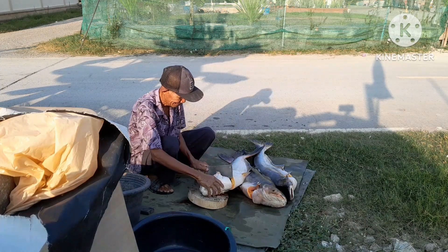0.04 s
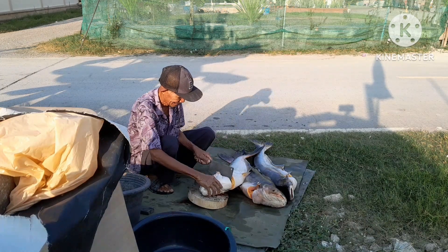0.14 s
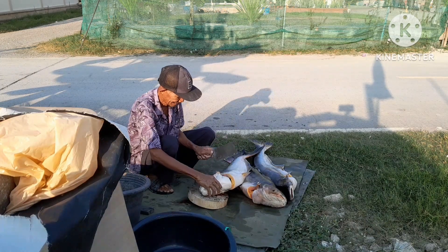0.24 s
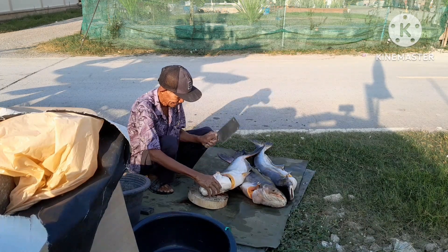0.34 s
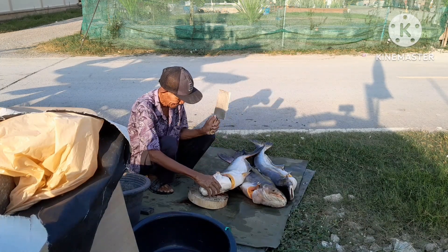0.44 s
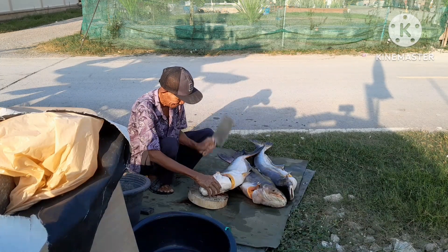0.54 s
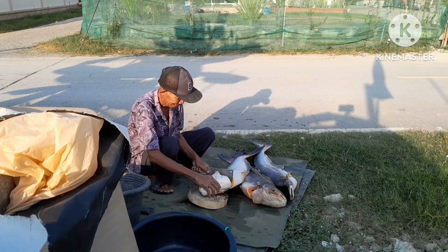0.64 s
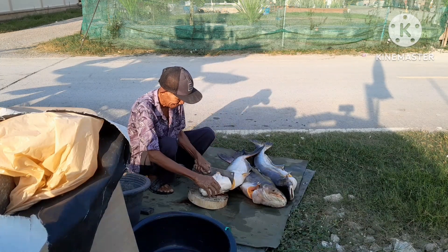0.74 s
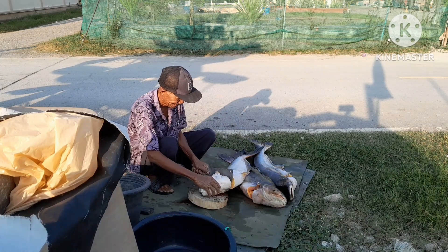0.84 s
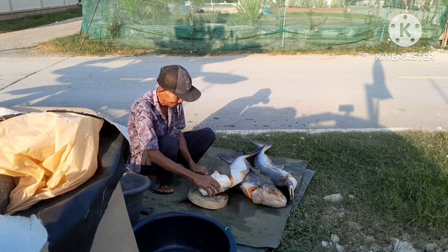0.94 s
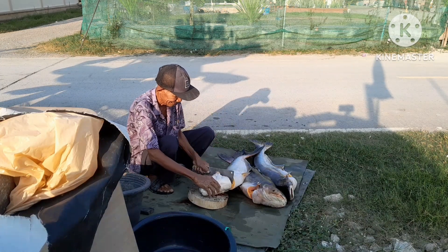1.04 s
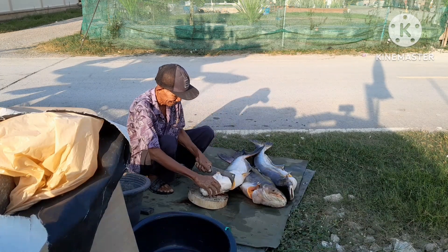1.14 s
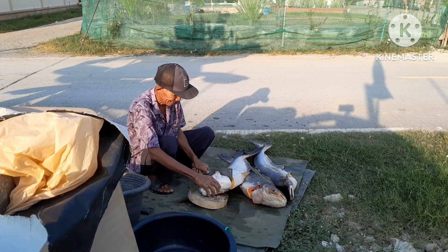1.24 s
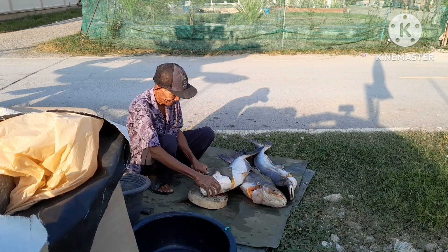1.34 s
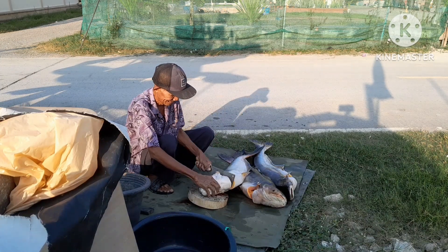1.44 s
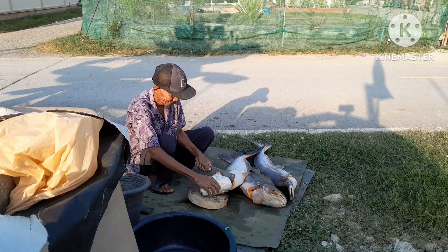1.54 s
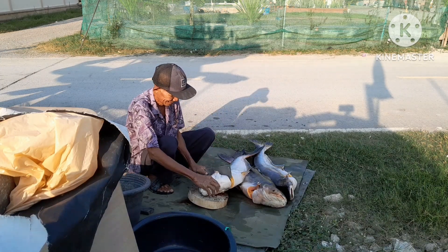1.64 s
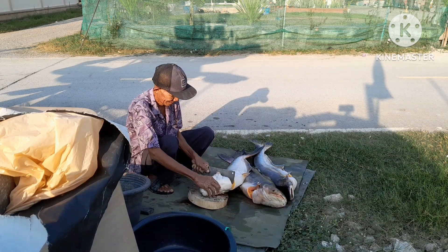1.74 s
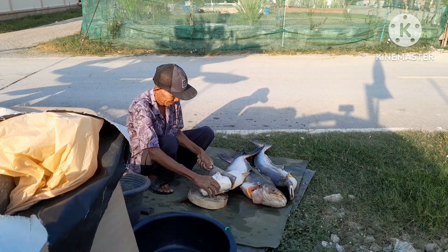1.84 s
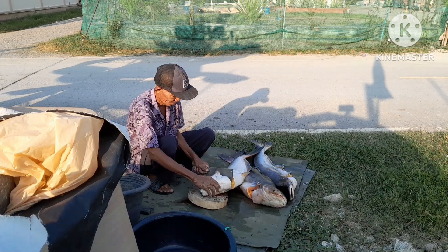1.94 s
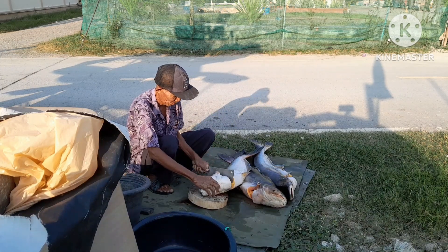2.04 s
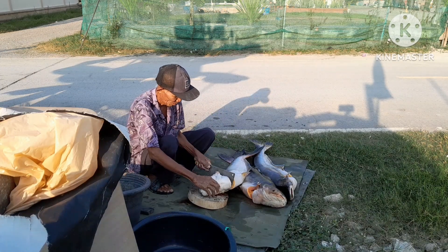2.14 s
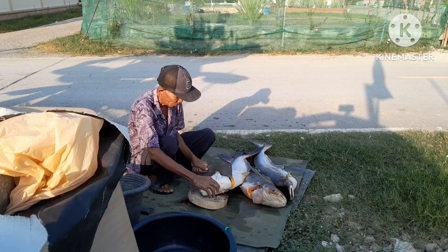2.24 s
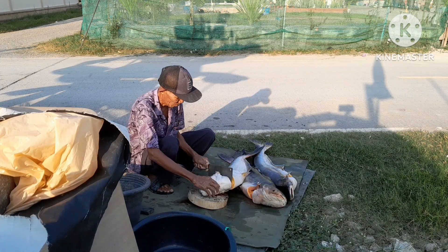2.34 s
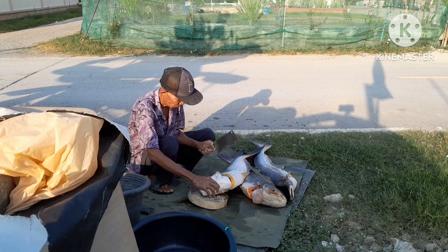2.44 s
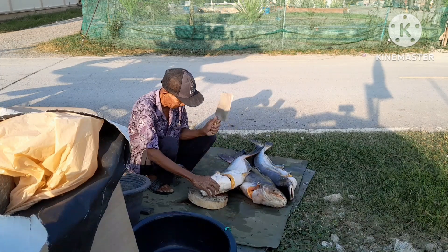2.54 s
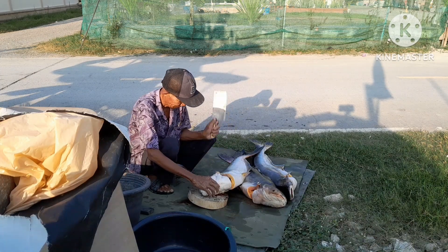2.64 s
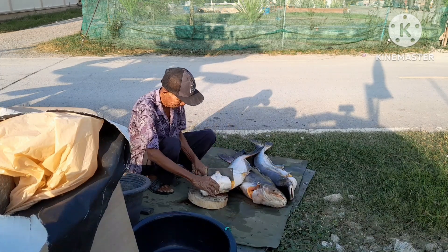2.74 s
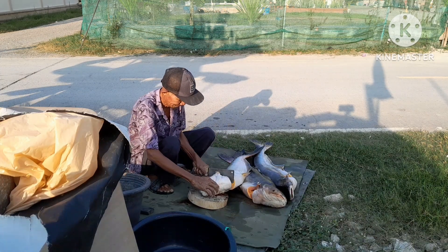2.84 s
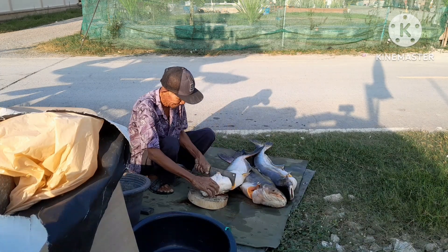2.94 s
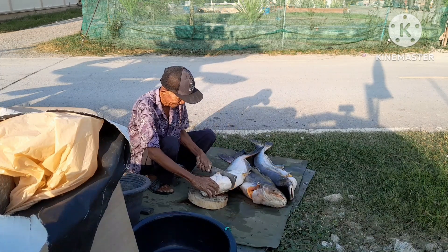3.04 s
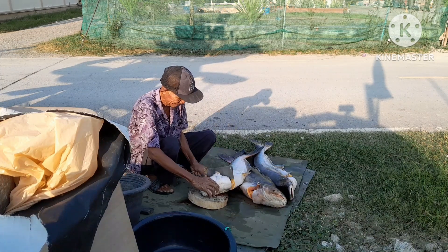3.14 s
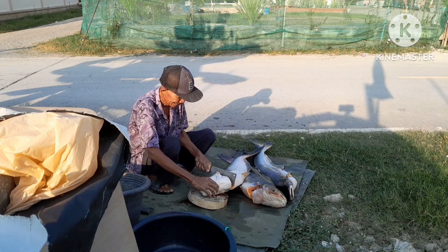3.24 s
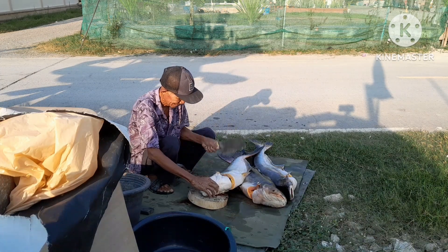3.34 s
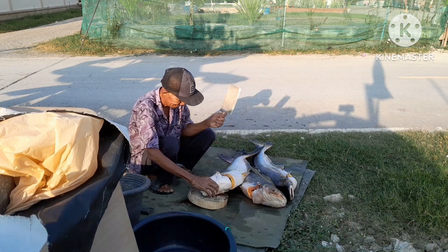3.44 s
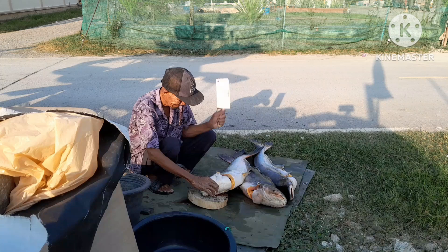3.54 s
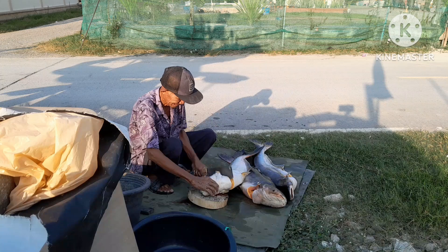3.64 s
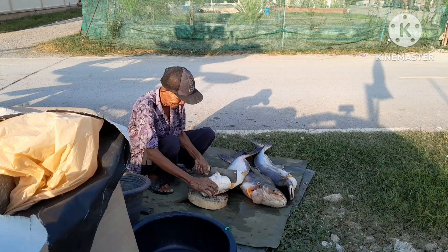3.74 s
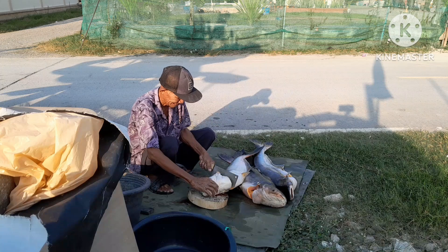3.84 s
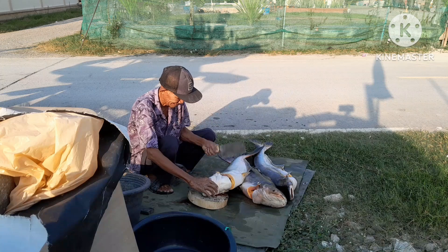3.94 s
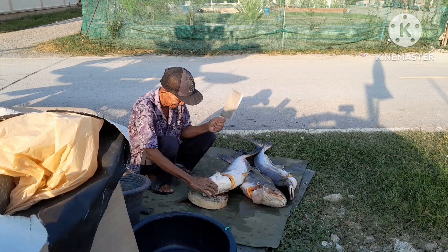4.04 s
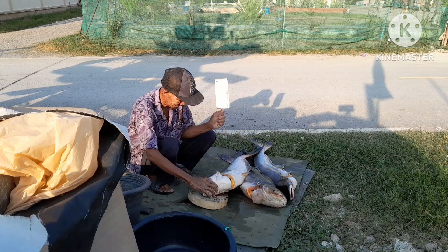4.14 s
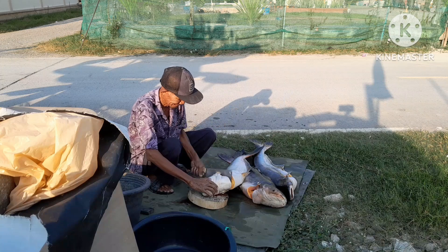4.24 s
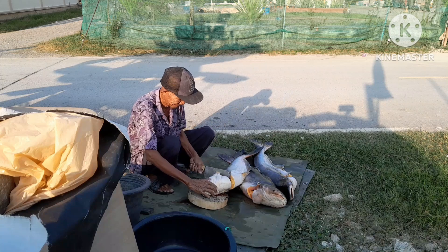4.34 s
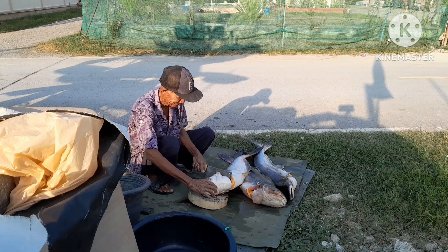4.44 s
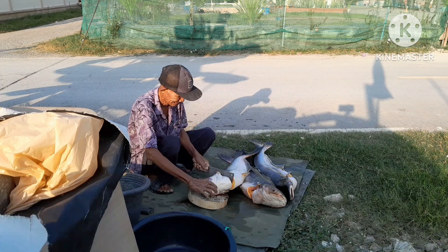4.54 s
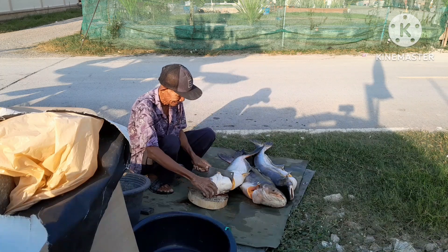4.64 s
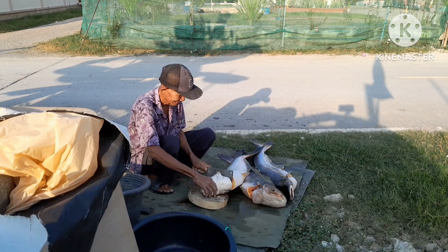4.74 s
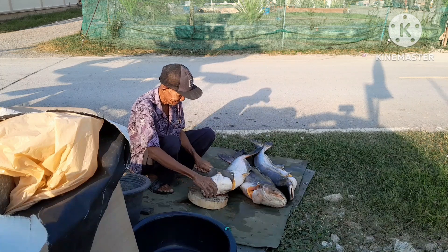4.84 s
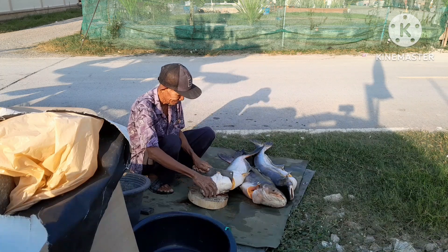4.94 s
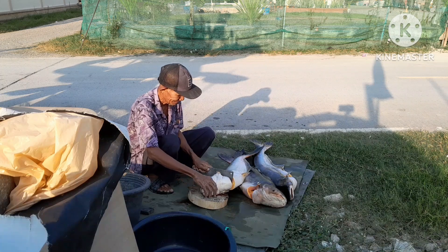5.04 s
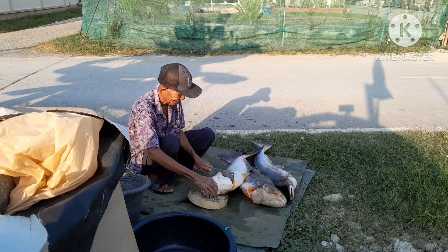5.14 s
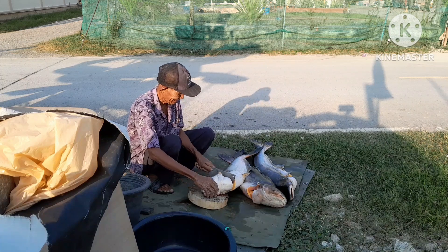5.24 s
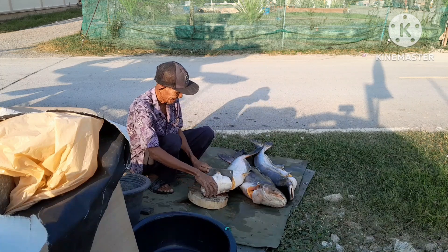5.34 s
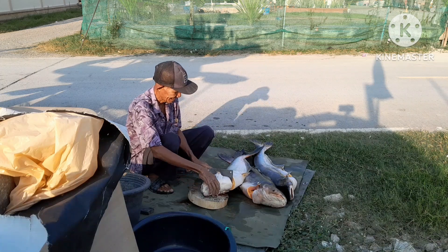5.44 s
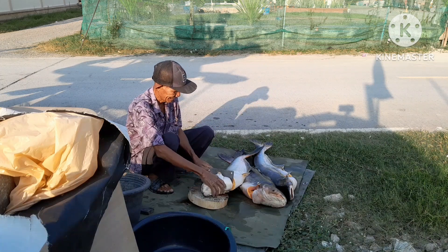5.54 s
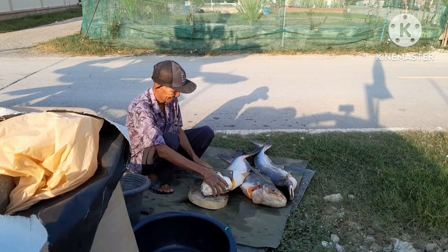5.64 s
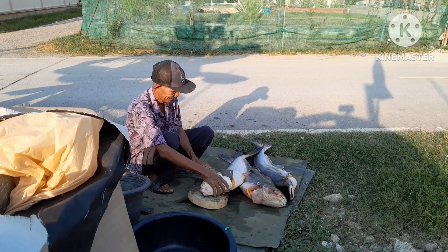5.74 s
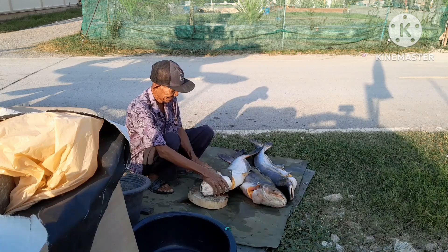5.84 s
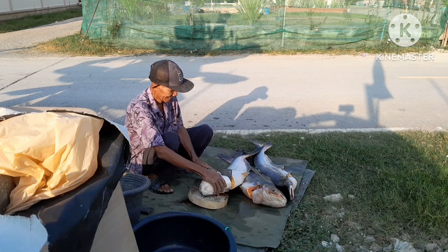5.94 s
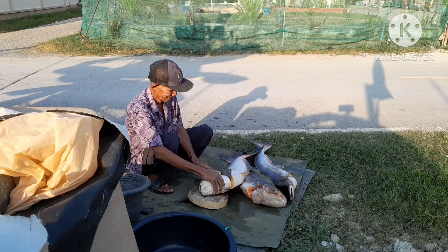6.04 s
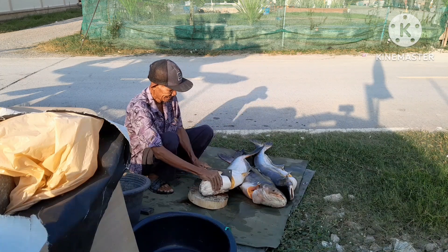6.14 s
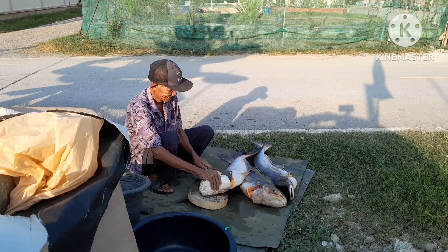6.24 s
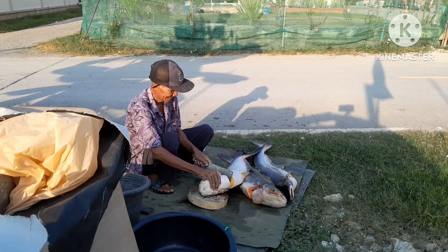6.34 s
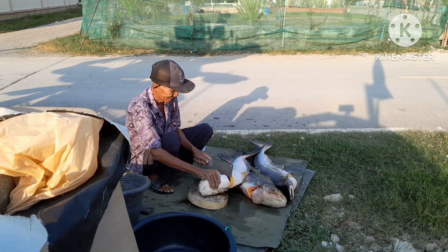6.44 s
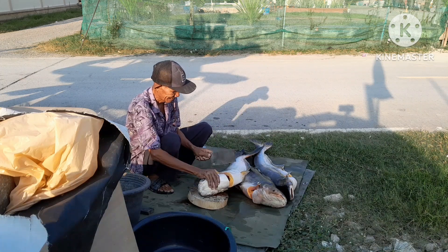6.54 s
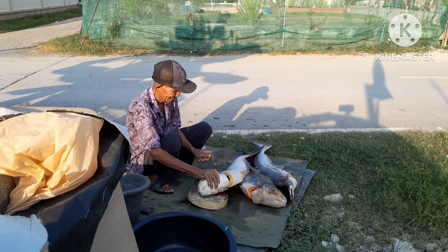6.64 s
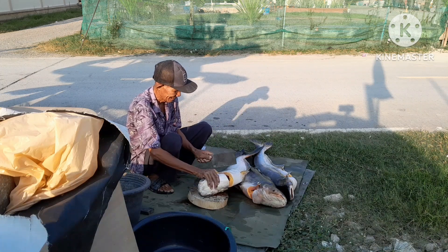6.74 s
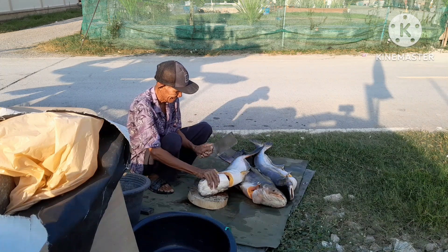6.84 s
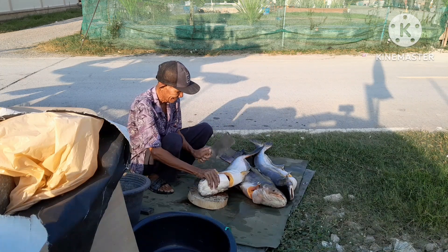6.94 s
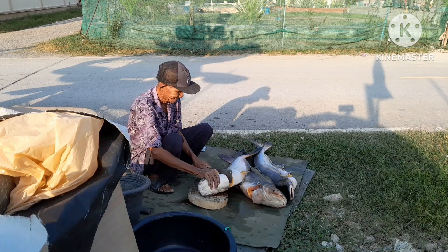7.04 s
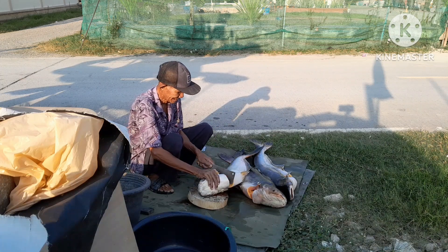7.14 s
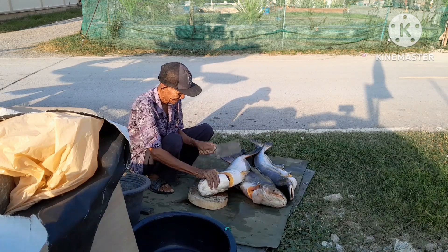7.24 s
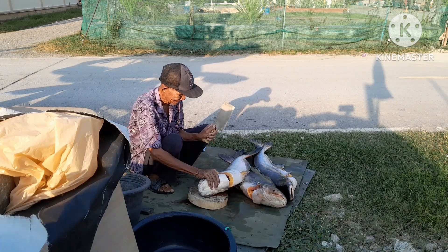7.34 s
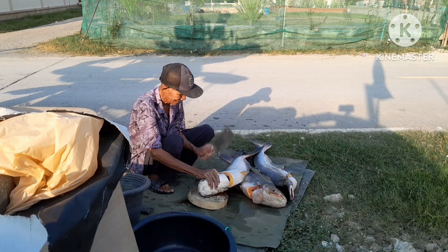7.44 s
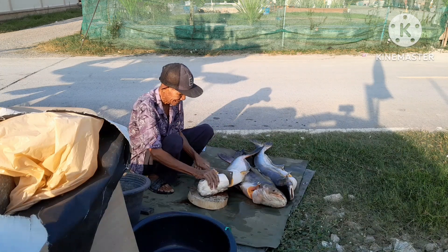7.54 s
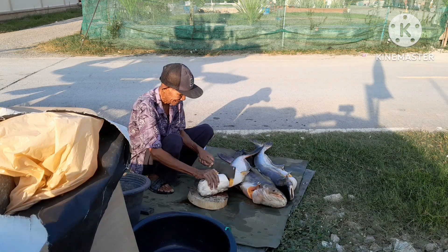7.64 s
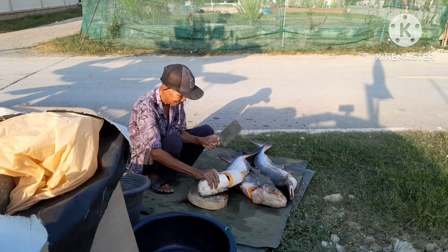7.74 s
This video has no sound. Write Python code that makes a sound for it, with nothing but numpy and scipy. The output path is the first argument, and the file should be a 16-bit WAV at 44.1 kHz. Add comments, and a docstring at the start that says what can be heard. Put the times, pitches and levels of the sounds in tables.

```python
"""A cleaver chops six times through a big fish on a round wooden block beside a quiet road.
Each blow is a noise burst for the bone, damped sines for blade and block, and delayed copies from a wall.
Small birds are gliding sines with shaken pitch, smeared by decaying noise; far roosters add harmonics
and a hoarse haze. Filtered noise makes distant traffic, a far flock, a soft midrange rush and a thin hiss."""
import sys
import numpy as np
from scipy import signal
from scipy.fft import rfft, irfft, next_fast_len
from scipy.io import wavfile
from scipy.ndimage import uniform_filter1d, map_coordinates

SR = 44100
rng = np.random.default_rng(int(sys.argv[2]) if len(sys.argv) > 2 else 0)


def waveform_to_disk(signal):
    """Save audio, clipped to [-1, 1], as 16-bit WAV at the path in sys.argv[1]."""
    frames = np.transpose(np.atleast_2d(signal))
    scaled = np.clip(frames, -1, 1) * 32767
    samples = np.round(scaled).astype(np.int16)
    wavfile.write(sys.argv[1], SR, samples)


N = 343980  # length in samples

# Loudness of the far flock. Each row: time in seconds, level in dB.
FLOCK_LEVEL = [(0, -76.5), (2, -84.5), (4.6, -76), (5.2, -74), (7.8, -67.5)]


def chops():
    """Superposition: direct blow, two specular reflections from a wall, and a diffuse tail."""
    # The blows; the fish loads the block differently each time. Each row: contact in seconds, crack level
    # in dB before a 3 dB cut, treble lift in dB, faint noise around contact in dB relative to the snap,
    # brightest frequency of the bone in Hz, its lift in dB, thud level in dB, knock in Hz, its level in dB
    # and t60 in seconds, final pitch of the clack in Hz, its level in dB and t60 in seconds, hollow mode
    # level in dB.
    blow_rows = [(0.6806, -23, -3.5, -14, 2370, 8.5, -26.5, 280, -23.5, 0.05, 714, -26, 0.033, -26),
                 (2.8245, -21.5, -.5, -7.5, 3200, 3.5, -28, 328, -7.5, 0.029, 700, -11.5, 0.019, -20),
                 (3.7272, -22, 7.5, -11.5, 1710, 1.5, -24.5, 217.4, -13.5, 0.033, 752, -18.5, 0.035, -23),
                 (4.335, -21, 5.5, -17, 3040, 1, -24.5, 325, -5.5, .022, 690, -21, 0.017, -21.5),
                 (7.095, -23, -2, -15, 2950, 4, -27.5, 335, -17.5, 0.038, 720, -24.5, 0.033, -25),
                 (7.5746, -19, -1, -22, 3150, 4.5, -28, 408, -4.5, .015, 605, -11.5, 0.043, -8.5)]
    # A further bone gives way within a blow. Each row: start in seconds, crack level in dB, t60 in seconds.
    second_bones = [(4.347, -30.5, 0.019)]
    crack_t60 = 0.023  # s
    wall_delay = .0345  # s
    first_slap_db, second_slap_db = -21, -30
    out, t = np.zeros((2, N)), np.arange(-SR // 50, SR // 2) / SR
    for s, db, treble_db, skirt_db, bone_hz, bone_db, *knock in blow_rows:
        treble = lambda hz: treble_db * hz ** 2 / (hz ** 2 + 4000 ** 2)
        bone = lambda hz: bone_db * np.exp(-((hz / bone_hz - 1) / 0.1) ** 2)
        coloured = lambda x: filtered(x, lambda hz: amp(db - 3 + treble(hz) + bone(hz)))
        wood = block(t, *knock)
        # the wood stands 0.8 dB stronger on the left
        blow = coloured(bite(t, crack_t60, skirt_db)) + wood * amp([[.4], [-.4]])
        # the crack leaves differently in every direction and comes back in uneven clumps
        rays = [*splinters(t, crack_t60, skirt_db), *splinters(t, crack_t60, skirt_db)]
        clumps = amp(1.8 * wobble(130)[:len(t)])
        crack_tail = clumps * coloured(sum(scatter(ray, stretch=0.87, build=0.0024) for ray in rays))
        wood_tail = scatter(wood, stretch=0.28, build=0.0083)
        add(out, s + t[0], blow + amp(-20.5) * crack_tail + amp(-17.5) * wood_tail)
        add(out, s + t[0] + wall_delay, amp(first_slap_db) * blow)
        # the second answer swaps left and right
        add(out, s + t[0] + 2 * wall_delay, amp(second_slap_db) * blow[::-1])
    for s, db, t60 in second_bones:
        add(out, s + t[0], amp(db) * bite(t, t60, skirt_db=-28.5))
    return out


def bite(t, t60, skirt_db):
    """Brittle fracture excites the damped bending modes of the steel: stereo crack with a brief ring."""
    # The cleaver, choked by flesh. Each row: mode in Hz, level in dB before a 24.5 dB cut, t60 in seconds.
    blade_modes = [(1280, 5, 0.056), (1676, -1, 0.11), (1845, -13, .035), (2317, -18, 0.041),
                   (2710, -9, .035), (3180, 9.5, 0.019), (4260, 1.5, 0.027), (4710, 10.5, 0.018),
                   (5406, 4, 0.026), (6300, -35.5, 0.0298), (7560, 13.5, 0.011), (9420, 10.5, 0.034),
                   (13900, -4, .03), (14100, -3, .03)]
    # Stereo spread of the crack. Each row: frequency in Hz, gain of the side signal in dB.
    side_gain = [(150, -23.5), (450, -21.5), (1000, -4), (2200, -8), (4500, -9.5), (9000, -0.5),
                 (15000, -3)]
    after = np.maximum(t, 0)
    mid, side = splinters(t, t60, skirt_db)
    for hz, db, ring_t60 in blade_modes:
        # every blow strikes the modes a little differently
        level = amp(db - 24.5 + 1.5 * rng.normal())
        mode_hz = hz * (1 + 0.00451 * rng.normal())
        tone = np.sin(2 * np.pi * (mode_hz * after + rng.random()))
        ring = level * fade(after, ring_t60) * tone * (t >= 0)
        mid, side = mid + ring, side + ring * rng.normal()
    side = filtered(side, lambda hz: amp(along(side_gain, hz)))
    return np.array([mid + side, mid - side])


def splinters(t, t60, skirt_db):
    """Fracture noise: the gritty crack of bone as sent in two directions; t = 0 when the edge meets it."""
    # Colour of the crack. Each row: frequency in Hz, relative level in dB.
    crack_colour = [(150, -15), (450, 9.5), (800, 9), (1020, -7), (1600, 1), (3200, 0.5), (6000, -3.5),
                    (8000, -8), (12000, -8.5), (15500, -11.5)]
    after = np.maximum(t, 0)
    noise = rng.standard_normal((2, len(t)))
    # the strength jumps every half millisecond
    steps = np.repeat(rng.standard_normal(len(t)), SR // 2000)[:len(t)]
    grit = noise * amp(1.5 * steps)
    # a faint noise swells in and out around each hit, the bone snaps, then wet flesh closes on the blade
    skirt = amp(skirt_db) * fade(np.abs(t), 0.014)
    snap = fade(np.maximum(after - .001, 0), t60) * (1 - np.exp(-after / 0.00021))
    flesh = amp(-22) * fade(after, .09) * (t > 0)
    return unit(filtered(grit, lambda hz: amp(along(crack_colour, hz)))) * (skirt + snap + flesh)


def block(t, thud_db, knock_hz, knock_db, knock_t60, clack_hz, clack_db, clack_t60, hollow_db):
    """Modal synthesis: three short modes of the wood, and the two-mode thud of the block on the ground."""
    # the blade's push lowers the clack by this share, and lets go with this time constant in seconds
    squeeze, release_s = 0.21, 0.0029
    after = np.maximum(t - .0013, 0)  # the blow reaches the wood a moment later
    mode = lambda hz, db, t60: amp(db) * fade(after, t60) * np.sin(2 * np.pi * hz * after)
    rising_hz = clack_hz * (1 - squeeze * np.exp(-after / release_s))
    clack_phase = 2 * np.pi * np.cumsum(rising_hz * (after > 0)) / SR
    clack = amp(clack_db) * fade(after, clack_t60) * np.sin(clack_phase)
    wood = mode(knock_hz, knock_db, knock_t60) - mode(481, hollow_db, 0.027) + clack
    thud = mode(120, thud_db, 0.091) - mode(216, thud_db, 0.049)
    return (wood + thud) * (1 - np.exp(-after / 0.0025))


def touches():
    """Friction noise: faint wet ticks, decaying exponentially, as fish is shifted and blade pulled free."""
    # Each row: start in seconds, level in dB, t60 in seconds.
    tick_rows = [(.605, -64, 0.12), (0.977, -61, 0.44), (3.232, -67, 0.034), (4.69, -72, 0.36),
                 (4.75, -73, 0.05), (6.382, -63, 0.14)]
    level, t = np.zeros(N), np.arange(SR // 4) / SR
    for s, db, t60 in tick_rows:
        add(level, s, amp(db) * fade(t, t60))
    return level * rush([(500, -4), (3000, 7), (5000, 12), (9000, 4.0), (15000, 2)])


def birds():
    """Direct and scattered sound together: whistles and raspy chirps from the trees, smeared by distance."""
    song, chatter = whistles(), chirps()
    clear = song + amp(2.0) * scatter(song, stretch=1.3, build=0.01)
    return clear + amp(3) * chatter + amp(3.5) * scatter(chatter, stretch=1.0, build=0.0033)


def whistles():
    """Near-sinusoidal tones with gliding frequency: arched slurs, short piping and thin peeps."""
    # One bird repeats a long slur, up and down again. Each row: start in seconds, level in dB.
    slur_rows = [(.19, -66.5), (3.84, -65.5), (7.32, -60.5)]
    # Short, slightly arched notes. Each row: start in seconds, length in seconds, middle pitch in Hz,
    # glide from end to end as a share of that pitch, level in dB.
    pipe_rows = [(-.04, 0.15, 2800, -0.099, -65.5), (0.142, 0.081, 2670, -0.084, -62.5),
                 (0.26, 0.22, 2530, -0.071, -70.5), (.18, 0.18, 3500, 0.034, -71.5),
                 (0.875, 0.14, 3404, 0.023, -68.5), (0.988, 0.08, 1944, 0.13, -75),
                 (1.148, 0.075, 2885, 0.074, -71.5), (2.973, 0.078, 4630, 0.044, -78),
                 (3.608, 0.11, 3830, -.03, -73.5), (3.898, 0.12, 2600, -.09, -77),
                 (4.496, 0.12, 3250, 0.057, -63.5), (4.615, .16, 3740, -0.036, -71.5),
                 (4.724, 0.059, 2510, -0.16, -70.5), (5.269, 0.077, 4040, -.1, -72),
                 (5.855, .17, 3118, -0.0073, -62), (6.279, 0.15, 3716, 0.0052, -69.5),
                 (6.584, 0.191, 3053, -.01, -61), (7.205, 0.098, 2947, 0.039, -56.5),
                 (7.338, 0.086, 3740, .02, -69.5), (7.367, 0.056, 2904, -0.077, -58.5),
                 (7.61, 0.068, 2800, -0.035, -62), (7.756, .065, 2680, -.04, -55.5)]
    # Thin high calls of a small bird. Each row: start in seconds, level in dB.
    peep_rows = [(1.81, -83), (3.992, -86), (4.97, -84)]
    slur_s, slur_hz = .5, [3370, 4100, 4360, 3860, 3230]  # pitch at even steps
    # the voice breaks at the top: place and width as shares of the length, depth in dB
    break_place, break_width, break_db = 0.49, 0.13, -19
    arch = .018  # both ends of a piped note lie this share under its middle, glide aside
    song = np.zeros(N)
    whistle = lambda length, pitches: note(length, pitches, waver=.018, rate=300)
    for s, db in slur_rows:
        slur = whistle(slur_s, slur_hz)
        top = np.exp(-((np.linspace(0, 1, len(slur)) - break_place) / break_width) ** 2)
        add(song, s, amp(db + break_db * top) * slur)
    for s, length, hz, glide, db in pipe_rows:
        pitches = [hz * (1 - arch - glide / 2), hz, hz * (1 - arch + glide / 2)]
        add(song, s, amp(db) * note(length, pitches, waver=.011, rate=260))
    for s, db in peep_rows:
        add(song, s, amp(db) * whistle(length=.15, pitches=[7680, 7500]))
    return song


def chirps():
    """Fast random frequency modulation makes short sweeps raspy: near ones, and far ones at random times."""
    # The nearest chirps. Each row: start in seconds, middle pitch in Hz, fall on either side of it as a
    # share (negative rises), level in dB before the birds are mixed.
    near_rows = [(.5, 4830, -0.13, -67.5), (1.457, 4750, 0.09, -70.5), (1.769, 4000, 0.12, -75.5),
                 (1.99, 3470, 0.05, -72.5), (2.176, 3340, 0.15, -67), (2.633, 3490, 0.25, -66),
                 (3.07, 3890, 0.087, -77), (3.28, 3900, 0.081, -70), (3.44, 3540, 0.15, -69),
                 (4.197, 4320, 0.11, -68), (4.5, 5070, .04, -70), (4.68, 4610, 0.15, -64.5),
                 (4.925, 4140, .09, -68.5), (5.065, 4210, 0.049, -68), (5.169, 5030, .13, -71),
                 (6.21, 5200, 0.19, -67), (6.415, 4440, .09, -66), (6.75, 4740, .16, -67),
                 (7.516, 4780, -0.086, -60.5)]
    far_per_s, far_middle_hz, far_spread = 4, 4520, .2  # spread: share of the pitch, up or down
    far_offset_db = -5.5  # over the flock's level
    chatter = np.zeros(N)
    when, pitch = rng.random((int(far_per_s * N / SR), 2)).T
    far_s = when * N / SR
    far_hz = far_middle_hz * (1 + far_spread * (2 * pitch - 1))
    far_db = far_offset_db + np.interp(far_s, *np.transpose(FLOCK_LEVEL))
    far_fall = rng.uniform(0, .2, len(far_s))
    for s, hz, fall, db in [*near_rows, *zip(far_s, far_hz, far_fall, far_db)]:
        sweep = note(.052, [hz * (1 + fall), hz * (1 - fall)], waver=.13, rate=900)
        add(chatter, s, amp(db) * sweep)
    return chatter


def note(length, pitches, waver, rate):
    """Phase is the integral of frequency: one swelling, gliding bird note, shaken rate times a second."""
    u = np.linspace(0, 1, int(length * SR))
    shake = lambda: np.interp(u * length * rate, np.arange(SR // 100), rng.standard_normal(SR // 100))
    # a polynomial through the pitches
    curve = np.polyfit(np.linspace(0, 1, len(pitches)), pitches, len(pitches) - 1)
    glide = np.polyval(curve, u)
    swell = np.abs(np.sin(np.pi * u)) ** 0.64 * amp(1.3 * shake())
    return swell * np.sin(2 * np.pi * np.cumsum(glide * (1 + waver * shake())) / SR)


def roosters():
    """Harmonic voices: far crows with arched pitch, whose hoarseness smears the second harmonic to a haze."""
    # Each row: start in seconds, length in seconds, base pitch of the second harmonic in Hz, rise as a
    # share of it, level in dB before mixing, fundamental in dB relative to that, hoarseness from 0 to 1.
    syllables = [(2.098, .3, 1310, 0.13, -63, -9, 0.27), (2.43, 0.28, 1342, 0.1, -62.5, -16, 0.27),
                 (3.446, 0.24, 1323, 0, -72, 5, 0.34), (5.04, 0.19, 1344, 0.011, -59, -14, 0.22),
                 (5.199, .31, 1354, 0.1, -62.5, -16, 0.67), (5.534, 0.26, 1457, 0.023, -66, -17, 0.47),
                 (6.242, 0.39, 1450, .08, -75.5, 5.5, 0.62), (6.741, .31, 1482, 0.065, -62, 4, 0.81),
                 (6.796, 0.21, 1793, 0.027, -67, -12, 0.73), (7.383, 0.25, 1428, .01, -64, -5, 0.65)]
    top, arch = .63, .3  # place and width of the pitch arch, shares of the syllable
    edge_s = 0.035  # attack and release
    direct_db, answer_db = 2.5, -2
    crow, haze = np.zeros(N), np.zeros(N)
    for s, length, base_hz, rise, db, fundamental_db, hoarse in syllables:
        t, hoarse = np.arange(int(length * SR)) / SR, np.clip(hoarse, 0, 1)
        waver = 1 + .004 * wobble(60)[:len(t)]
        rasp = 1 + .07 * wobble(500)[:len(t)]
        hz = base_hz * (1 + rise * np.exp(-((t / length - top) / arch) ** 2))
        level = amp(db) * np.clip(np.minimum(t, length - t) / edge_s, 0, 1)
        phase = np.pi * np.cumsum(hz * waver) / SR  # of the fundamental, at half of hz
        voice = np.sin(2 * phase) + amp(fundamental_db) * np.sin(phase) + amp(-25.5) * np.sin(3 * phase)
        hoarse_voice = np.sin(2 * np.pi * np.cumsum(hz * rasp) / SR)
        add(crow, s, np.sqrt(1 - hoarse) * level * voice)
        add(haze, s, np.sqrt(hoarse) * level * hoarse_voice)
    answer = scatter(crow + haze, stretch=.7, build=.012)
    direct = from_right(crow * amp([[-1], [4]]))
    return amp(direct_db) * direct + amp(answer_db) * answer


def outdoors():
    """Many incoherent sources sum to noise: distant traffic, a far flock's twitter and a thin steady hiss."""
    # A far engine's drone surges and sinks several times. Each row: time in seconds, level in dB.
    engine_level = [(0, -55.5), (3.6, -56), (4.25, -51), (4.7, -58.5), (5.05, -50), (5.9, -50),
                    (6.6, -51.5), (7.05, -56.5), (7.8, -53)]
    # Tyre noise from down the road. Each row: time in seconds, level in dB.
    tyre_level = [(0, -65.5), (1.6, -65), (2.4, -63), (3.2, -64), (3.8, -61), (4.7, -66), (5.1, -61),
                  (5.45, -67), (7.4, -58.5), (7.8, -63)]
    # Colours of town rumble, engine, tyres, flock and hiss. Each row: frequency in Hz, relative level in dB.
    rumble_colour = [(20, -42.5), (32, -23.5), (40, -11.5), (52, -1.5), (64, 3), (92, -4), (120, 2),
                     (150, -5), (190, -15.5), (300, -53)]
    drone_colour = [(100, -36.5), (160, 2), (215, 0), (270, -4), (340, -10), (420, -15), (600, -50.5)]
    road_colour = [(250, -28.5), (400, -4.5), (520, -3.5), (700, -6), (1000, -16.5), (1500, -24),
                   (2500, -37), (5000, -50)]
    flock_colour = [(1500, -22.5), (2600, -11), (3500, -1.5), (4400, 1.5), (5400, -2.5), (6500, -19),
                    (9000, -29)]
    hiss_colour = [(500, 10.5), (3000, 10), (8000, -0.5), (12000, -10), (15500, -6)]
    rumble_db, hiss_db = -49, -80.5
    (drone_db,), (road_db,), (flock_db,) = curves(engine_level), curves(tyre_level), curves(FLOCK_LEVEL)
    rumble = amp(rumble_db + 1.3 * wobble(11)) * rush(rumble_colour)
    drone = amp(drone_db + 0.94 * wobble(7)) * rush(drone_colour)
    road = amp(road_db + 0.8 * wobble(6)) * patchy(rush(road_colour), depth_db=2.5)
    flock = amp(flock_db) * patchy(rush(flock_colour), depth_db=6.5)
    return from_right(rumble + drone + road) + flock + amp(hiss_db) * rush(hiss_colour)


def swells():
    """Band noise under a Gaussian envelope: a soft midrange rush swells and fades."""
    # Each row: peak in seconds, time from the peak to 1/e in seconds, level in dB, centre in Hz.
    swell_rows = [(2.38, 0.41, -67.5, 990)]
    t = np.arange(N) / SR
    return sum(amp(db) * np.exp(-((t - s) / width) ** 2)
               * rush([(hz / 2, -15), (hz, 0), (hz * 2, -20), (hz * 10, -70)])
               for s, width, db, hz in swell_rows)


def rush(spectrum):
    """Frequency-dependent coherence: steady outdoor noise of rms 1, near mono in the bass."""
    # Each row: frequency in Hz, left-right correlation from -1 to 1.
    likeness = [(60, 0.97), (130, 1), (290, 0.97), (640, 1), (1400, 0.089), (3000, .15), (15000, -0.21)]
    # correlation is the cosine of twice the angle between mid and side
    turn = lambda hz: np.arccos(np.clip(along(likeness, hz), -1, 1)) / 2
    response = lambda hz: amp(along(spectrum, hz)) * [np.cos(turn(hz)), np.sin(turn(hz))]
    mid, side = filtered(rng.standard_normal((2, N)), response)
    return unit(np.array([mid + side, mid - side]))


def patchy(x, depth_db):
    """Short-time spectral modulation breaks a noise into small swells of time and pitch."""
    z = signal.stft(x, nperseg=512)[2]
    field = rng.standard_normal(z.shape[1:])
    field = uniform_filter1d(uniform_filter1d(field, size=6, axis=0), size=12, axis=1)
    return unit(signal.istft(z * amp(depth_db * unit(field)), nperseg=512)[1][:, :N])


def scatter(x, stretch, build):
    """Convolution with decaying noise: diffuse answer of houses and hedges, gathering over build seconds."""
    # Each row: frequency in Hz, t60 in seconds before stretching.
    decay = [(150, 0.16), (700, 0.74), (2500, 0.53), (6000, 0.48), (14000, 0.48)]
    hz, t, z = signal.stft(rng.standard_normal((2, SR // 2)), SR, nperseg=256)
    envelope = fade(t, stretch * along(decay, hz)[:, None]) * (1 - np.exp(-t / build))
    tail = signal.istft(z * envelope, SR, nperseg=256)[1]
    return signal.fftconvolve(x[None], tail / np.linalg.norm(tail[0]), axes=1)[:, :len(x)]


def from_right(pair):
    """Interaural-style delay by a linear phase: sound from down the road reaches the left channel later."""
    lag = .0004  # s
    return filtered(pair, lambda hz: np.exp(1j * np.pi * hz * lag * np.array([[-1], [1]])))


def amp(db):
    """Logarithmic level: decibels to gain."""
    return 10 ** (np.asarray(db) / 20)


def unit(x):
    """Normalisation of power: scale to rms 1."""
    return x / np.sqrt(np.mean(x ** 2) + 1e-20)


def fade(t, t60):
    """Exponential decay that loses 60 dB in t60."""
    return np.exp(-np.log(1000) * t / t60)


def along(points, hz):
    """Interpolation of (Hz, value) points on a logarithmic frequency axis."""
    f, v = np.transpose(points)
    return np.interp(np.log(hz + 1), np.log(f + 1), v)


def curves(rows):
    """Linear interpolation in time: one value per sample for each column after the time."""
    s, *cols = np.transpose(rows)
    return [np.interp(np.arange(N) / SR, s, c) for c in cols]


def wobble(rate):
    """Band-limited fluctuation: a smooth random curve, rate knots a second."""
    return map_coordinates(rng.standard_normal(int(N * rate / SR) + 4), [np.arange(N) * rate / SR])


def filtered(x, response):
    """Linear filtering: the spectrum of x times a response of frequency."""
    n = x.shape[-1]
    m = next_fast_len(n + SR // 8)
    return irfft(rfft(x, m) * response(np.fft.rfftfreq(m, 1 / SR)), m)[..., :n]


def add(track, s, sound):
    """Superposition: mix a sound into a track at time s, cut at the track's ends."""
    start = round(s * SR)
    sound = sound[..., max(-start, 0):N - start]
    track[..., max(start, 0):start + sound.shape[-1] + max(-start, 0)] += sound


def scene():
    """Superposition of everything heard at the roadside."""
    return chops() + touches() + birds() + roosters() + outdoors() + swells()


def record(dry):
    """Band limitation: a very steep low-pass filter."""
    top_hz = 15800
    return filtered(dry, lambda hz: 1 / (1 + (hz / top_hz) ** 160))


dry = scene()
out = record(dry)
waveform_to_disk(out)
```